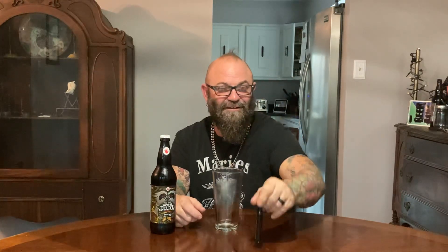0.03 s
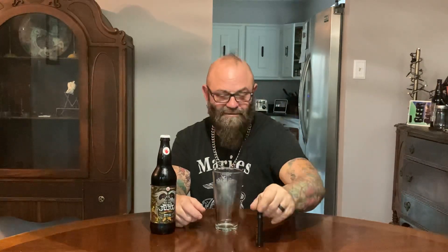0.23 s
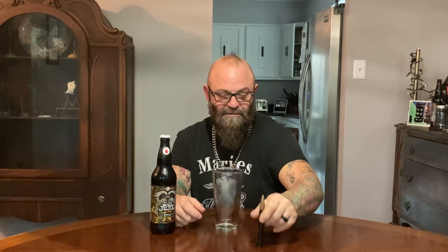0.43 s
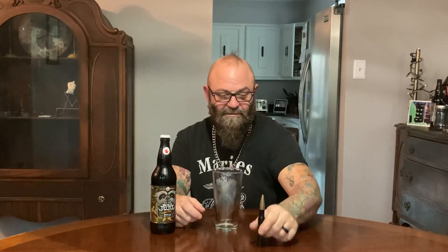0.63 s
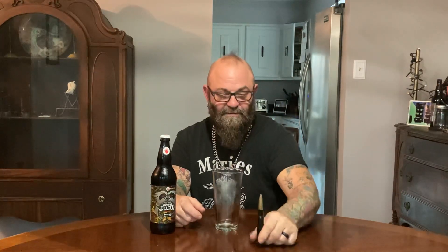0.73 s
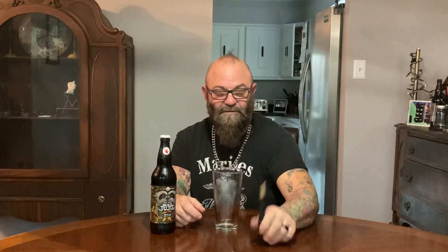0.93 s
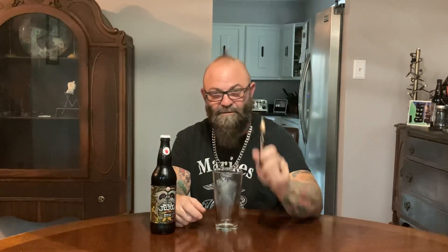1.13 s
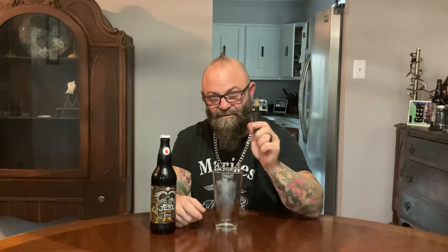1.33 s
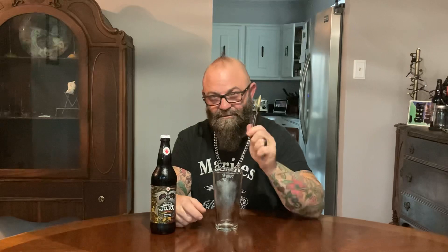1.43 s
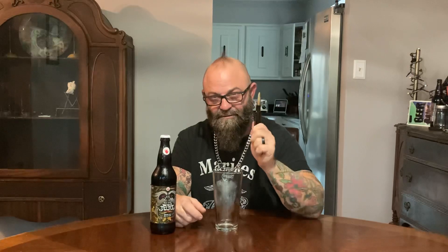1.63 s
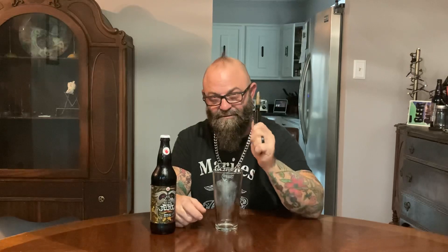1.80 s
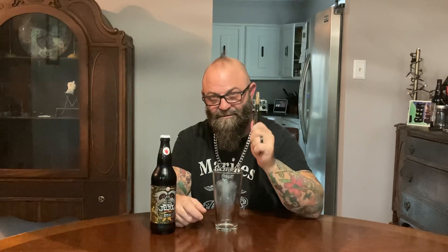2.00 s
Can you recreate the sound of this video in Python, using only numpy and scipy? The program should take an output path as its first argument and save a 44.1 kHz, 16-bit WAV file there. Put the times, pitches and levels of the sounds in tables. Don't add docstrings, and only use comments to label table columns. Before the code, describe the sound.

A sharp, hard knock of a small steel tool on a big wooden table indoors

```python
import sys
import numpy as np
from scipy import signal
from scipy.fft import rfft, irfft
from scipy.io import wavfile

SR = 44100
rng = np.random.default_rng(int(sys.argv[2]) if len(sys.argv) > 2 else 0)


def volts(x):
    e = np.asarray(x, float) / 20
    return 10 ** e


def digitize_waveform(pressure):
    field = np.atleast_2d(pressure).T
    bounded = np.clip(field, -1, 1)
    quanta = np.round(bounded * 32767).astype(np.int16)
    wavfile.write(sys.argv[1], SR, quanta)


N = 90890
KNOCK_S = 0.0911
BOTH_SIDES = np.array([[1], [-1]])


def curve(table, hz):
    table = np.array(table)
    return np.interp(np.log(hz), np.log(table[:, 0]), table[:, 1])


def band(hz, width_hz, channels):
    f = np.fft.rfftfreq(N, 1 / SR)
    bell = np.exp(-0.5 * ((f - hz) / width_hz) ** 2)
    noise = irfft(rfft(rng.standard_normal((channels, N))) * bell, N)
    return noise / noise.std(axis=1, keepdims=True)


# frequency_hz, correlation (-1 to 1)
LIKENESS = [(60, 0.82), (180, 1), (400, 0.38), (1000, 0.307), (3000, -0.048), (6000, -0.14), (12000, 0.15)]


def pair(hz, width_hz):
    mid, side = band(hz, width_hz, channels=2)
    likeness = np.clip(curve(LIKENESS, hz), -0.99, 0.99)
    return np.sqrt((1 + likeness) / 2) * mid + np.sqrt((1 - likeness) / 2) * side * BOTH_SIDES


def ring(modes, late_s, rise_cycles, pass_cycles, after_db, jitter_db):
    t = np.arange(SR // 5) / SR
    out = 0
    for hz, level_db, t60_s in modes:
        level_shift, pitch_shift = jitter_db * rng.standard_normal(2)
        u = np.maximum(t - late_s * 1000 / hz, 0)
        rise = 1 - np.exp(-(u * hz / rise_cycles) ** 2)
        passing = np.exp(-(u * hz / pass_cycles) ** 4)
        ringing = volts(after_db - 60 * u / t60_s)
        env = rise * volts(level_db + level_shift) * (passing + ringing)
        out = out + env * np.sin(2 * np.pi * hz * (1 + pitch_shift / 300) * u)
    return out / np.abs(out).max()


def add(track, at_s, sound):
    i = int(at_s * SR)
    track[i:i + len(sound)] += sound[:N - i]


# frequency_hz, level_db, t60_s
TABLE_MODES = [(234, -15, .06), (391.7, -15.5, 0.059), (590.8, -11.5, 0.075), (748, -6, 0.025),
               (936.3, -10, .04), (1237, 3.5, .055), (1697, -1.5, 0.0589), (2187, -4.5, 0.039),
               (3087, -10.5, .03), (4297, -27.5, .024), (4574, -32, 0.016)]
KNOCK_DB = -1.6
CRACK_DB, CRACK_T60_S, CRACK_HZ = -49, 0.02, 5350


def knock():
    out = np.zeros(N)
    u = np.arange(SR // 10) / SR
    wood = ring(TABLE_MODES, late_s=0.0008, rise_cycles=1.1, pass_cycles=4.0, after_db=-9, jitter_db=0)
    add(out, KNOCK_S, volts(KNOCK_DB) * wood)
    treble = signal.butter(4, CRACK_HZ, "high", fs=SR, output="sos")
    crack = signal.sosfilt(treble, rng.standard_normal(len(u)))
    onset = np.clip(u / 0.00042, 0, 1)
    add(out, KNOCK_S, volts(CRACK_DB - 60 * u / CRACK_T60_S) * onset * crack)
    return out


LEAD_IN_DB, LEAD_IN_S, LEAD_IN_HZ, LEAD_IN_PAN_DB = -31, 0.012, 1900, -10.5


def lead_in():
    before_s = KNOCK_S - np.arange(N) / SR
    fade_in = np.clip(2 - before_s / LEAD_IN_S, 0, 1)
    env = (before_s > 0) * fade_in * np.exp(-np.abs(before_s) / LEAD_IN_S) * volts(LEAD_IN_DB)
    return env * band(LEAD_IN_HZ, 450, channels=2) * volts(BOTH_SIDES * 0.5 * LEAD_IN_PAN_DB)


# frequency_hz, level_db, t60_s
SOFT_TABLE_MODES = [(192, -8.5, 0.046), (218, -14, 0.083), (422.5, -1.5, 0.097), (559, 2.5, 0.039),
                    (748, 0.5, 0.025), (991, -5.5, 0.057), (1316, 0.5, 0.012), (1710, -3.5, 0.0073)]
# frequency_hz, level_db, t60_s
STEEL_MODES = [(1500, 20, 0.01), (3983, 2.5, .05), (4750, -11, 0.016), (6600, -20, 0.018),
               (8060, -30, 0.016), (9700, -27.5, 0.015), (11500, -19.5, .04)]
# start_s, level_db, push_s
TOUCHES = [
    (.737, -36.5, 0.00043),
    (.749, -42, 0.00026),
    (0.761, -40, 0.0002),
    (1.036, -41, 0.0007),
    (1.046, -52, 0.00046),
    (1.064, -55, 0.00073),
    (1.09, -54.5, 0.0028),
]
# start_s, level_db
TICKS = [
    (0.703, -61),
    (.727, -42),
    (.915, -57.5),
    (1.032, -57),
]
RUSTLE_S, RUSTLE_LEN_S, RUSTLE_HZ, RUSTLE_DB = 0.694, 0.029, 12170, -89


def touches():
    out = np.zeros(N)
    for start_s, level_db, push_s in TOUCHES:
        u = np.arange(SR // 200) / SR / push_s
        push = u * np.exp(-4 * u)
        modes = ring(SOFT_TABLE_MODES, late_s=0.0003, rise_cycles=0.5, pass_cycles=1.5, after_db=-3, jitter_db=2)
        wood = np.convolve(modes, push)
        add(out, start_s, volts(level_db) * wood / np.abs(wood).max())
    for start_s, level_db in TICKS:
        steel = ring(STEEL_MODES, late_s=0, rise_cycles=0.5, pass_cycles=3, after_db=-2, jitter_db=1.5)
        add(out, start_s, volts(level_db) * steel)
    slide = np.exp(-((np.arange(N) / SR - RUSTLE_S) / RUSTLE_LEN_S) ** 2)
    return out + volts(RUSTLE_DB) * slide * band(RUSTLE_HZ, 180, channels=1)[0]


# frequency_hz, level_db, t60_s, swell_s
HUM = [(54.8, -53, 6.0, 0.2), (117.54, -48, 4.4, 0.25), (132.75, -41, 3.7, 0.15), (171, -47.5, 3.1, 0.065),
       (230.8, -42.5, 3.7, 0.18), (283.6, -52, 3, 0.18), (328.6, -46, 2.8, 0.065), (393.7, -44, 1.5, .15),
       (500.2, -46.5, 1.6, .15), (587, -54, 2.4, 0.147)]
HUM_WIDTH_HZ, HUM_SIDE_DB = 6.0, -19.5


def hum():
    u = np.maximum(np.arange(N) / SR - KNOCK_S, 0)
    out = 0
    for hz, level_db, t60_s, swell_s in HUM:
        mid, side = band(hz, HUM_WIDTH_HZ, channels=2)
        env = volts(level_db - 60 * u / t60_s) * (1 - np.exp(-(u / swell_s) ** 2))
        out = out + env * (mid + volts(HUM_SIDE_DB) * side * BOTH_SIDES)
    return out


# frequency_hz, t60_s
ROOM_T60 = [(100, 0.3), (300, 0.82), (700, 0.53), (1400, 0.77), (2700, 0.76), (5500, 0.8), (11000, 0.7)]
# frequency_hz, level_db
ROOM_COLOUR = [(100, -1.5), (300, -4), (600, 0), (1400, -9.5), (2700, -4), (4500, -8), (7000, 16),
               (15000, -0.5)]
ROOM_DB, EARLY_DB, EARLY_T60_S, ROOM_GAP_S = -40.5, 5, 0.12, 0.0033


def room(x):
    u = np.arange(N) / SR - ROOM_GAP_S
    echo = 0
    for hz in 80 * 2 ** np.arange(0, 7.7, 0.5):
        tail = volts(-60 * u / curve(ROOM_T60, hz))
        early = volts(EARLY_DB - 60 * u / EARLY_T60_S)
        level = volts(curve(ROOM_COLOUR, hz)) * np.sqrt(hz / 1000)
        echo = echo + level * (tail + early) * pair(hz, hz / 6)
    onset = np.clip(u / 0.0026, 0, 1)
    return signal.fftconvolve(x[None], volts(ROOM_DB) * echo * onset, axes=1)[:, :N]


# frequency_hz, density_db (dB per Hz)
HOUSE = [(28, -13), (55, -1), (130, 0), (430, -3.5), (850, -18), (1250, -20.5), (2200, -37.5), (12000, -44)]
HOUSE_DB = -58


def house():
    out = 0
    for hz in 30 * 2 ** np.arange(0, 9.2, 0.5):
        flicker_db = 0.5 * band(0, 2.58, channels=1)
        out = out + volts(curve(HOUSE, hz) + flicker_db) * np.sqrt(hz) * pair(hz, hz / 6)
    return volts(HOUSE_DB) * out / out.std()


LOW_CUT_HZ, KNOCK_PAN_DB, TOUCH_WET_DB = 95, -1.5, -7


def scene():
    low_cut = signal.butter(4, LOW_CUT_HZ, "high", fs=SR, output="sos")
    blow, small = signal.sosfilt(low_cut, [knock(), touches()])
    direct = (blow + small) * volts(np.array([[0], [-KNOCK_PAN_DB]]))
    return direct + room(blow + volts(TOUCH_WET_DB) * small) + lead_in() + hum() + house()


def low_pass(x):
    return signal.sosfilt(signal.butter(12, 16370, fs=SR, output="sos"), x)


# frequency_hz, width_hz, mid_db, side_db
PORTS = [(6050, 300, -1, -2), (8960, 480, -40.5, 3), (13600, 500, -39, -8), (15600, 1200, -6.5, -13.5)]
DUCK_DB, DUCK_IN_S, DUCK_HOLD_S, DUCK_OUT_S = -2, 0.019, 0.19, 0.04


def record(dry):
    u = np.arange(N) / SR - KNOCK_S
    recovery = 1 + np.exp(np.minimum((u - DUCK_HOLD_S) / DUCK_OUT_S * 4, 50))
    duck = np.clip(u / DUCK_IN_S, 0, 1) / recovery
    left, right = dry * volts(DUCK_DB * duck)
    f = np.fft.rfftfreq(N, 1 / SR)
    dips_db = 0
    for hz, width_hz, mid_db, side_db in PORTS:
        dips_db = dips_db + np.exp(-0.5 * ((f - hz) / width_hz) ** 4) * np.array([[mid_db], [side_db]])
    mid, side = irfft(rfft([left + right, left - right]) * volts(dips_db), N) / 2
    return low_pass(np.array([mid + side, mid - side]))


dry = scene()
out = record(dry)
digitize_waveform(out)
```